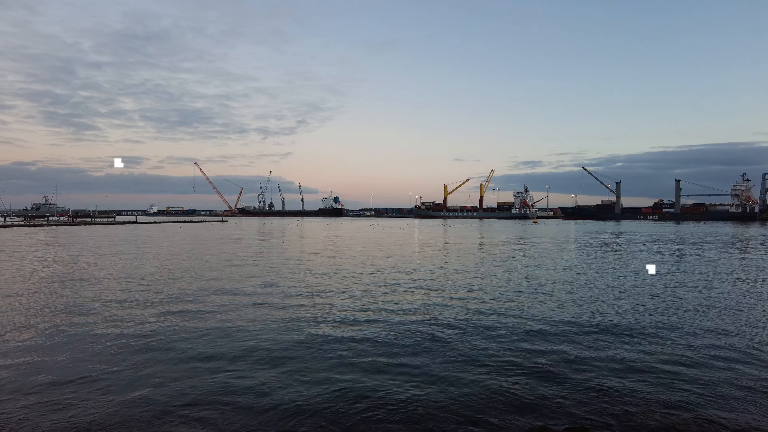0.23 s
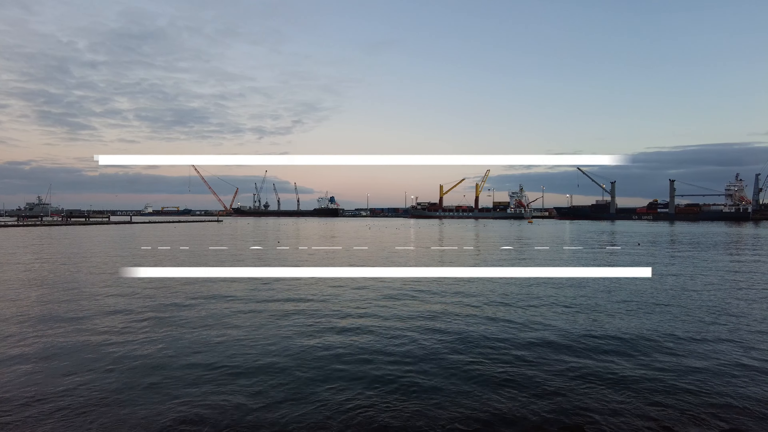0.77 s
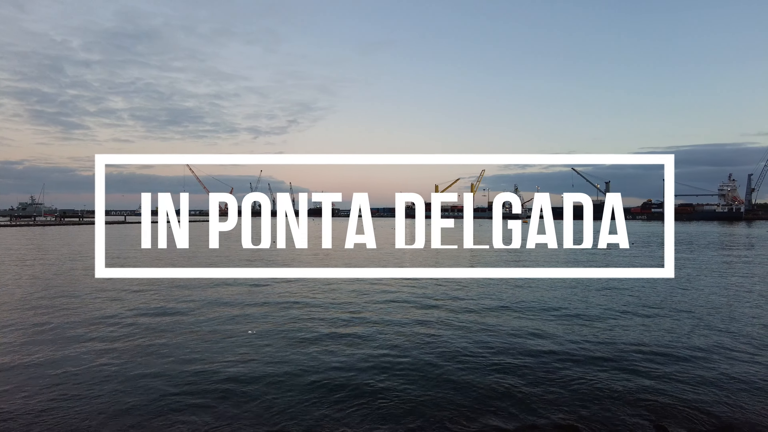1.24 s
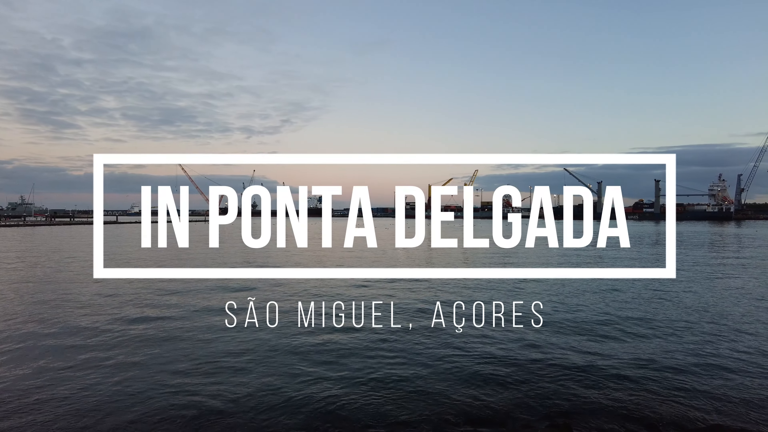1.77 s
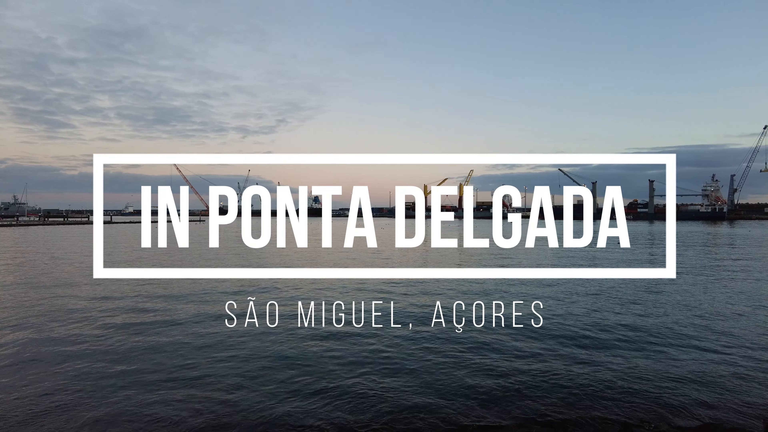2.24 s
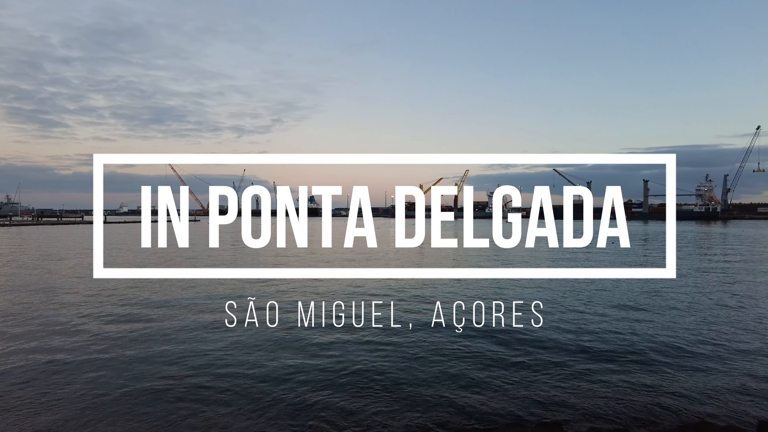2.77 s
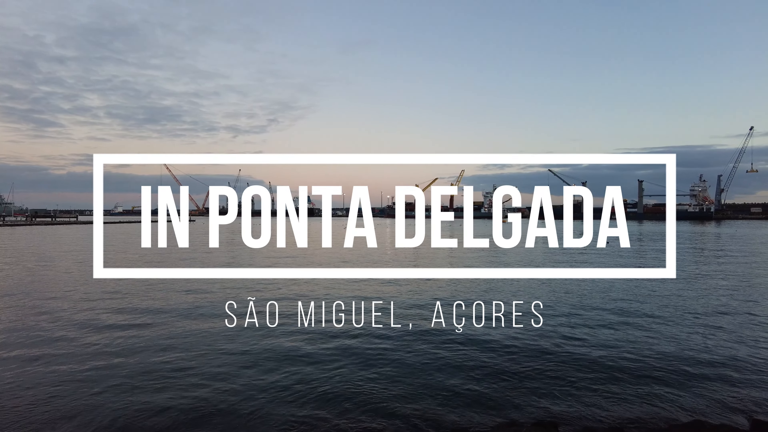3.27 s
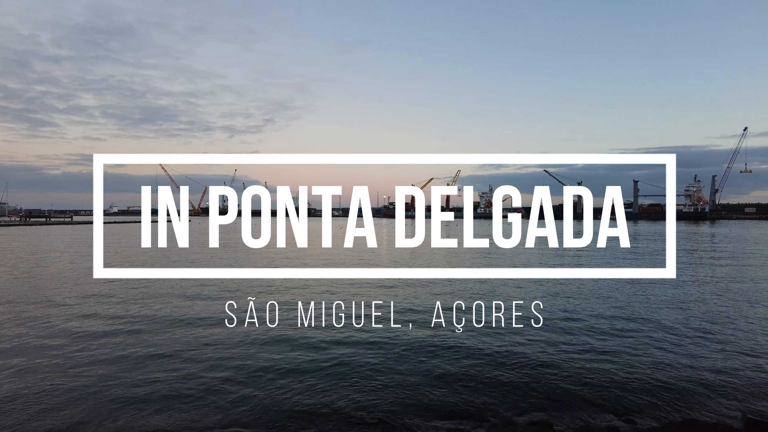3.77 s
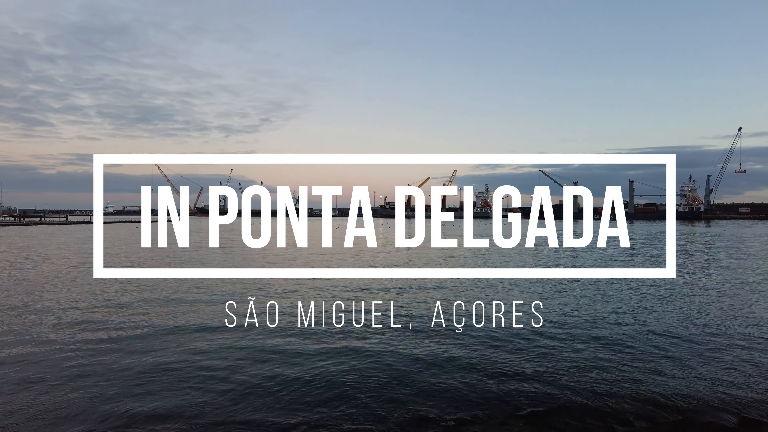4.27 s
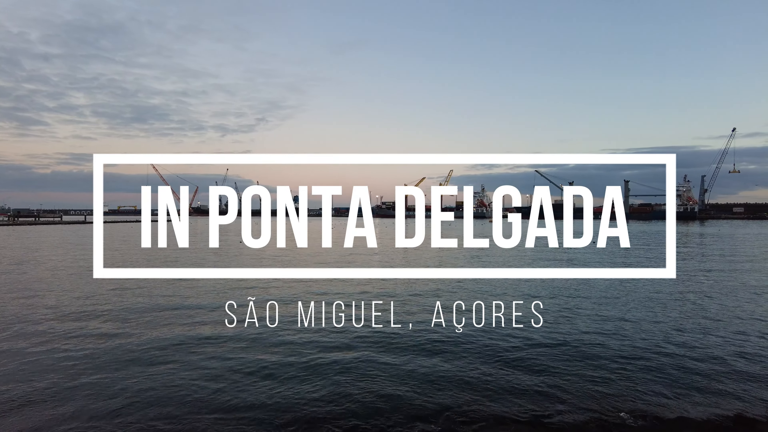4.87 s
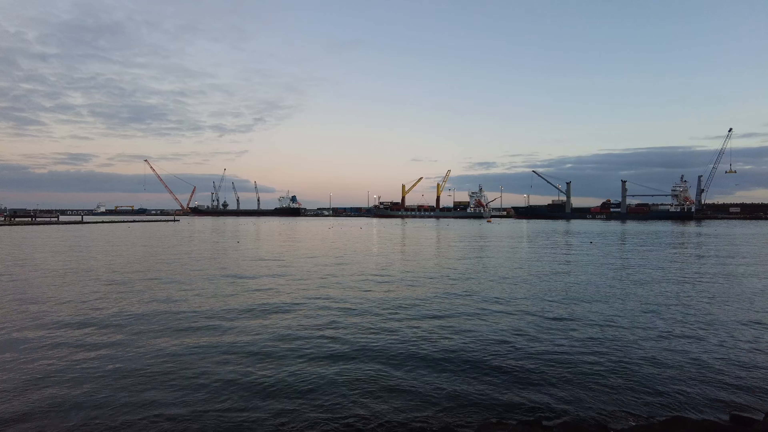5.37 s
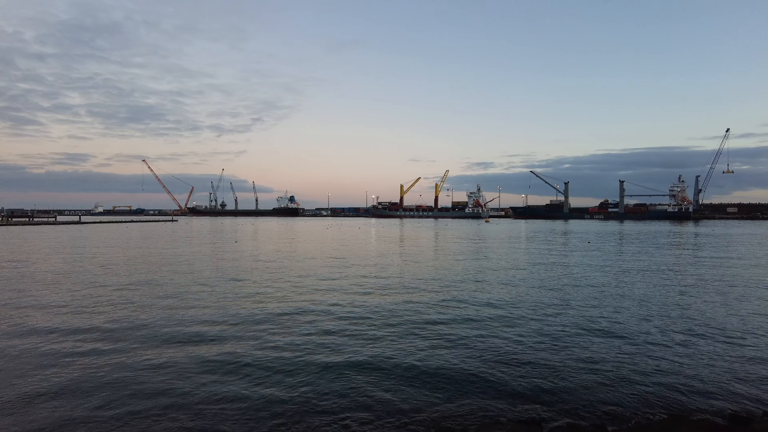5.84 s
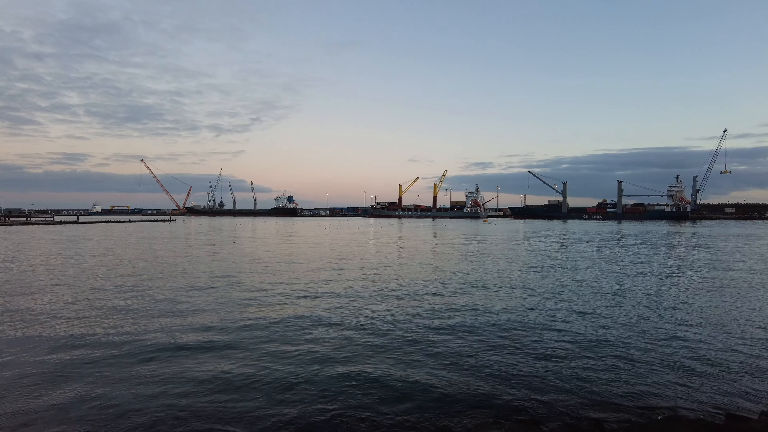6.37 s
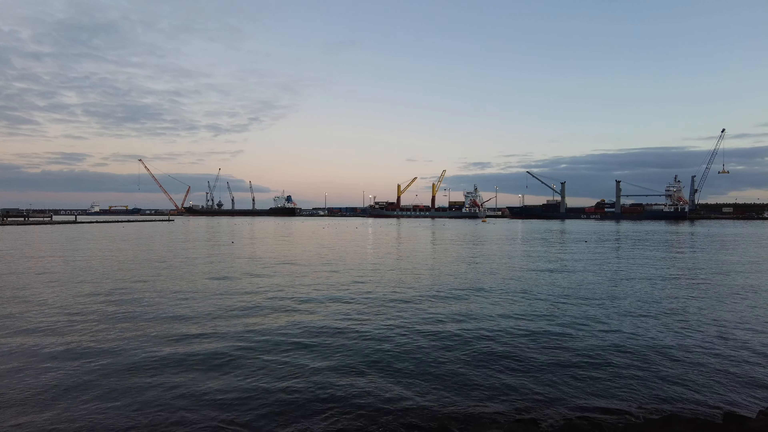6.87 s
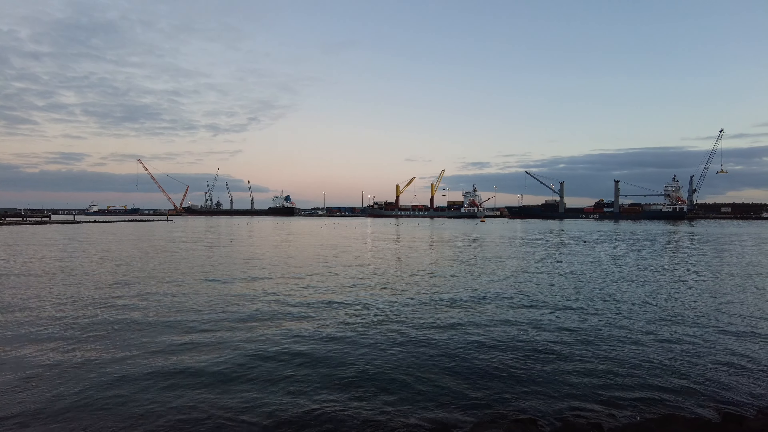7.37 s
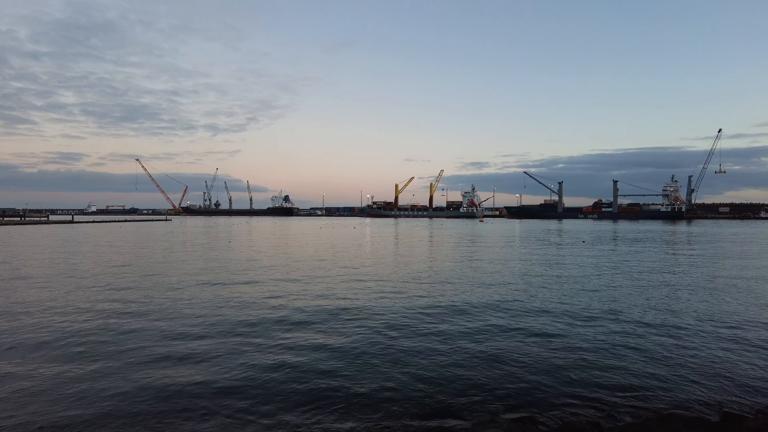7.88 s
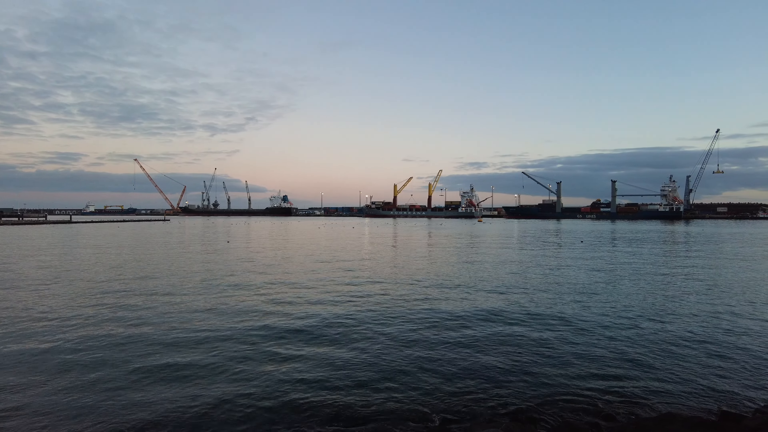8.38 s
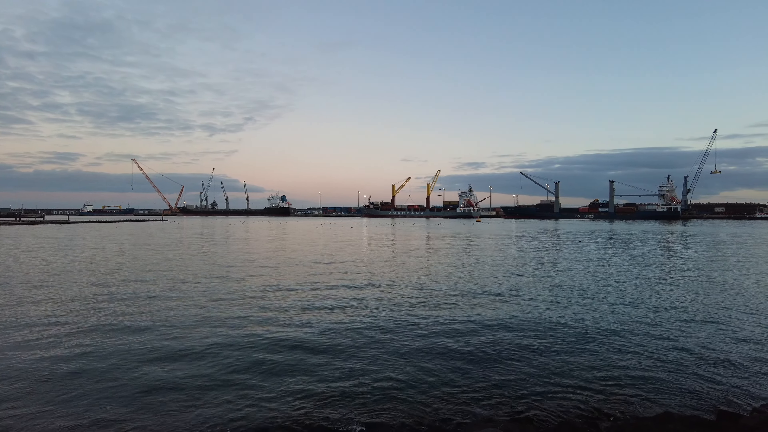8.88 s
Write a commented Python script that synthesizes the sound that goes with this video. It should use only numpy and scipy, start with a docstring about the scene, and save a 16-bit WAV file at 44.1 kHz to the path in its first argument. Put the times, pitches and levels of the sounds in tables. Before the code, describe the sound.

Outdoors on a harbour shore, a distant ship's diesel throbs steadily under a low port rumble, its strength wavering. Soft water washes and fizzes on stones. Small birds twitter, give falling calls and thin whistles, then a gulp of water sounds past the middle. Later three bright, close falling warbles stand out over faint far gulls. One fixed microphone, quiet and open, with slight quay echoes.

```python
"""Harbour at dusk

From the shore, a ship's diesel throbs across calm water: harmonics of one engine cycle, each wavering.
Small birds chirp, whistle and warble nearby as gliding sines, with echoes of decaying noise from the quay.
Water washes and ticks on the stones: shaped noise, ringing bubbles and droplets, and one gulp in a hollow.
Behind it lie faint two-harmonic gull cries, a blur of birds further off, and the port's rumble and hums."""
import sys
import numpy as np
from scipy import signal
from scipy.fft import rfft, irfft, next_fast_len
from scipy.io import wavfile
from scipy.ndimage import uniform_filter1d

SR = 44100
rng = np.random.default_rng(int(sys.argv[2]) if len(sys.argv) > 2 else 0)


def int16_out(signal):
    """Quantize to a 16-bit WAV file."""
    q = np.round(np.clip(np.atleast_2d(signal).T, -1, 1) * 32767)
    wavfile.write(sys.argv[1], SR, q.astype(np.int16))


N = 401751
TIME = np.arange(N) / SR


def undb(db):
    """Decibels to gain."""
    return 10 ** (np.asarray(db) / 20)


def curve(rows, column=1):
    """One column of a time table, interpolated at every sample."""
    rows = np.array(rows)
    return np.interp(TIME, rows[:, 0], rows[:, column])


def walk(rate):
    """Smooth random motion with a spread near 1, from `rate` fresh values a second."""
    k = int(SR / rate)
    held = np.repeat(rng.standard_normal(N // k + 2), k)
    return 1.3 * uniform_filter1d(uniform_filter1d(held, k), k)[:N]


def swell(s, width):
    """A smooth rise to 1 at time s and back."""
    return np.exp(-((TIME - s) / width) ** 2)


def colour(x, points):
    """Give white noise of unit power a spectrum in dB per Hz, eased down towards the top."""
    hz, db = np.transpose(points)
    size = next_fast_len(N)
    f = np.fft.rfftfreq(size, 1 / SR)
    gain = undb(np.interp(np.log(f + 1e-9), np.log(hz), db)) * np.sqrt(SR / 2)
    gain /= 1 + (f / (2 * hz[-1])) ** 2
    return irfft(rfft(x, size) * gain, size)[:N]


def add(out, s, sound):
    """Mix a short sound in at time s."""
    i = max(int(s * SR), 0)
    out[i:i + len(sound)] += sound[:max(N - i, 0)]


def tone(hz):
    """A sine of unit power that follows a pitch."""
    return np.sqrt(2) * np.sin(2 * np.pi * np.cumsum(hz) / SR)


def glide(length, start, middle, end, edge=0.14):
    """Pitch bending through three points, and a loudness that opens and closes softly."""
    u = np.linspace(0, 1, int(length * SR))
    hz = start * (1 - u) * (1 - 2 * u) + 4 * middle * u * (1 - u) + end * u * (2 * u - 1)
    opening = np.sin(np.pi / 2 * np.minimum(np.minimum(u, 1 - u) / edge, 1))
    return hz, opening * (.65 + .35 * np.sin(np.pi * u))


def flutter(n, size=130):
    """Quick, smooth unsteadiness of a voice; a larger size in samples makes it slower."""
    noise = rng.standard_normal(n + size)
    smooth = uniform_filter1d(uniform_filter1d(noise, size), size // 3)
    return smooth[size // 2:][:n] * np.sqrt(size)


def chirp(length, start, middle, end, buzz=0, buzz_hz=190, depth=.055, jitter=.0025, shimmer_db=1.0):
    """A nearly pure whistle; a fast, uneven tremor of the syrinx makes it buzz."""
    hz, loud = glide(length, start, middle, end)
    tremor = np.sin(2 * np.pi * np.cumsum(buzz_hz * (1 + 0.18 * flutter(len(hz)))) / SR)
    bend = 1 + depth * buzz * tremor + jitter * flutter(len(hz))
    shimmer = undb(shimmer_db * flutter(len(hz)))
    return loud * (1 + 0.38 * buzz * tremor) * shimmer * tone(hz * bend)


def sloped(db, change_db, note):
    """A note set to a level, which changes by change_db from its start to its end."""
    return undb(db + change_db * np.linspace(-.5, .5, len(note))) * note


def ring(hz, cycles, rise=0):
    """A struck pocket of air: a sine that falls to 1/e in so many cycles, its pitch perhaps rising."""
    u = np.linspace(0, 1, int(2 * np.pi * cycles * SR / hz) + 2)
    return np.exp(-2 * np.pi * u) * np.sin(2 * np.pi * np.cumsum(hz * (1 + rise * u)) / SR)


def echoes(x, t60, delay):
    """Scattered returns: a delayed, decaying noise tail of unit energy."""
    t = np.arange(int(t60 * SR)) / SR
    tail = rng.standard_normal(len(t)) * undb(-60 * t / t60) * (t > delay)
    return signal.fftconvolve(x, tail / np.linalg.norm(tail))[:N]


# Ship across the water, harmonics of its engine cycle: multiple, level_db, fading_share (0-1)
DIESEL_HARMONICS = [(6, -57, 0), (8, -62, 0.5), (9, -47.5, 0), (10, -46.5, 1), (12, -56, 0.3),
                    (15, -51, 0.9), (16, -58, 0.14), (18, -67, 0.3), (20, -60, 0.7), (21, -63.5, 0.2),
                    (24, -66, 0.05), (25, -67.5, 0.4)]
# How well the diesel carries over the water: time_s, below_100_hz_db, above_100_hz_db
WATER_CARRY = [(0.1, -0.5, 1), (0.7, 3, 3.5), (1.5, 5, 2), (2.6, -0.5, 2.0), (3.6, 3.0, 3), (4.4, 4.5, 1),
               (5.05, 7, -2.5), (5.55, -3, -10), (6.4, 1.5, -0.5), (7.2, 1.5, -1.5), (7.9, -7.5, 4),
               (9.0, -6.5, 2.5)]
CYCLE_HZ = 7.505


def diesel(wander=0.23, waver_db=1.7):
    """Harmonics of one engine cycle beat against each other; the air path makes each waver."""
    out, low_carry, high_carry = 0, curve(WATER_CARRY), curve(WATER_CARRY, column=2)
    for multiple, db, share in DIESEL_HARMONICS:
        hz = round(multiple) * CYCLE_HZ
        carry = low_carry if hz < 100 else high_carry
        phase = 2 * np.pi * (hz * TIME + rng.random()) + wander * walk(3)
        level = undb(db + share * carry + waver_db * walk(4))
        out = out + np.sqrt(2) * np.sin(phase) * level
    return out


def birds(far_echo_db=-6.8, near_echo_db=-12.5, bounce_s=0.0025, wall_s=.011, wall_db=-13.5):
    """Calls, pips, whistles and loud falling warbles, returned by the water and the quay."""
    near = warbler() + twitterer()
    far = pips() + whistles() + callers()
    # a bounce off the water ripples the level of every distant sweep
    far = far + .3 * np.interp(TIME - bounce_s, TIME, far)
    # one off the harbour wall doubles its edge
    far = far + undb(wall_db) * np.interp(TIME - wall_s, TIME, far)
    # the quay returns less of the warbling and the twittering bird, which are nearest
    quay = echoes(undb(far_echo_db) * far + undb(near_echo_db) * near, t60=0.45, delay=0.0034)
    return near + far + quay


# Syllables of three loud falling warbles, close by: top_of_climb_s, length_s, top_hz, level_db
WARBLE_SYLLABLES = [(7.166, .010, 7200, -65), (7.191, 0.018, 5900, -59), (7.215, 0.02, 5620, -52),
                    (7.235, .016, 5070, -54), (7.256, 0.021, 4720, -57), (7.273, 0.027, 4270, -62),
                    (7.291, 0.024, 4020, -59), (7.310, 0.024, 3820, -57.5), (7.325, 0.021, 3540, -56),
                    (7.337, 0.016, 3080, -59), (7.461, 0.01, 6900, -66), (7.488, 0.017, 6170, -56.5),
                    (7.511, 0.026, 5440, -59), (7.533, 0.022, 4960, -49), (7.551, 0.014, 4700, -45.5),
                    (7.571, 0.018, 4490, -50), (7.591, .014, 4310, -52), (7.609, .019, 3950, -58),
                    (7.621, 0.019, 3500, -56.5), (7.635, .015, 3180, -55), (7.647, .013, 2890, -60),
                    (7.782, 0.0082, 7070, -66), (7.806, 0.016, 5930, -53), (7.831, 0.019, 5550, -51),
                    (7.850, .020, 5000, -55), (7.867, 0.018, 4600, -50), (7.887, .020, 4450, -50),
                    (7.908, 0.017, 4250, -49.5), (7.925, 0.012, 4130, -54), (7.941, .007, 3800, -59),
                    (7.95, .013, 3150, -59), (7.964, .013, 2850, -64)]
# Share of its top pitch that a syllable climbs through: top_hz, share (0-1)
CLIMB_BY_PITCH = [(3000, 0.085), (4300, .15), (5500, 0.22), (7000, .13)]


def warbler(climb_share=.8):
    """Runs of saw-tooth syllables step down in pitch; each climbs for climb_share of its length."""
    out, turn = np.zeros(N), min(climb_share, .95)
    for s, length, top, db in WARBLE_SYLLABLES:
        climb = np.interp(top, *np.transpose(CLIMB_BY_PITCH))
        add(out, s - turn * length, undb(db) * tooth(length, top * (1 - climb), top, turn))
    return out


def tooth(length, start, top, turn=.8, rough_db=1.5):
    """One syllable of a warble: it swells as it climbs, then snaps back down; no two are alike."""
    u = np.linspace(0, 1, int(length * SR))
    bow = rng.uniform(.5, .68)  # share of the climb done at half its time
    hz = np.interp(u, [0, turn / 2, turn, 1], [start, start + bow * (top - start), top, start * 0.96])
    loud_points = [0, .3 * turn, .75 * turn, turn, (1 + turn) / 2, 1]
    loud = np.interp(u, loud_points, [0, .45, 1, .7, .3, 0])
    rough = undb(rough_db * flutter(len(u), size=60))
    return loud * rough * tone(hz * (1 + 0.011 * flutter(len(u), size=60)))


# Notes of the near twitter: delay_s, length_s, start_hz, middle_hz, end_hz, level_db, level_change_db
TWITTER_NOTES = [(0, .026, 6420, 5680, 5150, 0, 4), (.031, .012, 4850, 4640, 4450, 2, 5),
                 (.04, .006, 4550, 4100, 3400, 1, -4), (.05, .01, 3300, 3950, 3150, -1.5, 0),
                 (.061, .010, 3200, 3000, 2800, -6, 0)]
# When it is sung: start_s, level_db, buzz (0-1)
TWITTER_TIMES = [(0.011, -64.3, 0.15), (0.125, -63.5, 0.15), (0.238, -65.5, .15), (.358, -67.7, .15),
                 (0.476, -71.5, 0.25), (.594, -67.3, 0.2), (0.712, -68.3, 0.15)]


def twitterer():
    """A near bird repeats one quick run of notes, falling overall."""
    return calls([(TWITTER_NOTES, TWITTER_TIMES)])


# Notes of the more distant calls, each of fixed shape:
# delay_s, length_s, start_hz, middle_hz, end_hz, level_db, level_change_db
TSIP_NOTES = [(0.0014, .053, 5550, 4880, 3500, 0, 0)]
TEW_NOTES = [(0, .063, 4850, 3880, 3050, 0, -1)]
TEE_NOTES = [(0.0036, .058, 4480, 4030, 3450, 0, 0)]
CHUP_NOTES = [(0, .07, 3400, 3120, 2400, 1, 3)]
TSEW_NOTES = [(0, .056, 4550, 3750, 2650, 0, 7)]
TEW_TIK_NOTES = [(0, .079, 5330, 4045, 3190, 0, -2), (.104, 0.022, 3750, 3400, 3100, -1.2, 0)]
# When each is sung: start_s, level_db, buzz (0-1)
TSIP_TIMES = [(1.128, -77, .3), (1.288, -73, 0.3), (1.926, -72, .25), (2.253, -70, .4), (2.542, -72, .35)]
TEW_TIMES = [(2.801, -68.5, .2), (2.992, -68, .2), (3.189, -68.5, .2), (3.383, -71, .2)]
TEE_TIMES = [(3.655, -77, .55), (3.788, -74.5, .5), (3.925, -76, .5), (4.056, -75.5, .5), (5.32, -79, .4)]
CHUP_TIMES = [(2.784, -70.3, .35), (2.944, -69.8, .45), (3.11, -69.3, .55), (6.906, -70, 1),
              (7.073, -68.8, .8)]
TSEW_TIMES = [(5.323, -73, .1), (5.443, -74.5, .1), (5.586, -76, .1), (5.731, -71.5, .1),
              (5.876, -72.5, .1), (6.026, -71, .1)]
TEW_TIK_TIMES = [(6.163, -67.5, .55), (6.344, -71, .4), (6.529, -69.5, .45), (6.718, -67, .9)]


def callers():
    """Birds further away than the warbler and twitterer repeat short falling calls."""
    return calls([(TSIP_NOTES, TSIP_TIMES), (TEW_NOTES, TEW_TIMES), (TEE_NOTES, TEE_TIMES),
                  (CHUP_NOTES, CHUP_TIMES), (TSEW_NOTES, TSEW_TIMES), (TEW_TIK_NOTES, TEW_TIK_TIMES)])


def calls(repertoire, uneven_db=0.7):
    """Birds that repeat one call each, louder or softer, cleaner or buzzier."""
    out = np.zeros(N)
    for notes, sung in repertoire:
        for s, db, buzz in sung:
            for delay, length, start, middle, end, note_db, change_db in notes:
                note = chirp(length, start, middle, end, buzz)
                note_level_db = db + note_db + uneven_db * rng.standard_normal()
                add(out, s + delay, sloped(note_level_db, change_db, note))
    return out


# Short soft pips that drop at one rate: start_s, length_s, pitch_hz, level_db
SOFT_PIPS = [(4.25, .025, 2750, -70), (4.69, .03, 2660, -67), (4.745, .018, 4700, -71),
             (8.595, .02, 2770, -69), (8.935, .018, 2960, -74), (8.997, .018, 3030, -72),
             (9.057, .02, 2940, -70.5)]
PIP_OCTAVES_PER_S = 15
# Sharp flicks that whip downwards: start_s, length_s, pitch_hz, level_db
SHARP_FLICKS = [(5.44, .023, 5900, -66.5), (6.99, 0.0095, 3900, -63), (7.006, .013, 3550, -60.5),
                (8.065, 0.024, 5900, -63.5)]
FLICK_START, FLICK_END = 1.19, .89  # pitch against the middle of the flick
# Rattles of quick down-strokes: start_s, strokes, spacing_s, first_hz, last_hz, level_db,
# swell_exponent (higher peaks more in the middle)
STROKE_RATTLES = [(6.338, 10, .0187, 6150, 5480, -73, .3), (6.328, 7, .0186, 4450, 4300, -77, .3),
                  (6.891, 5, .0184, 5520, 4980, -67.5, 1.3)]
STROKE_S, STROKE_FALL = .014, .16  # length, and fall either side of the middle pitch


def pips(buzz=.1, uneven_db=1.0, stray=.018, stray_s=.0009):
    """Short falling notes: soft pips, sharp flicks and rattles of down-strokes."""
    out = np.zeros(N)
    for s, length, hz, db in SOFT_PIPS:
        fall = 2 ** (PIP_OCTAVES_PER_S * length / 2)
        add(out, s, undb(db) * chirp(length, hz * fall, hz, hz / fall, buzz))
    for s, length, hz, db in SHARP_FLICKS:
        add(out, s, undb(db) * chirp(length, hz * FLICK_START, hz, hz * FLICK_END, buzz))
    for s, strokes, spacing, first, last, db, exponent in STROKE_RATTLES:
        strokes = round(strokes)
        for k, hz in enumerate(np.linspace(first, last, strokes)):
            arch = np.sin(np.pi * (k + .5) / strokes) ** exponent
            hz = hz * (1 + stray * rng.standard_normal())
            stroke = chirp(STROKE_S, hz * (1 + STROKE_FALL), hz, hz * (1 - STROKE_FALL))
            stroke = stroke * np.hanning(len(stroke)) * 2
            when = s + k * spacing + stray_s * rng.standard_normal()
            add(out, when, undb(db + uneven_db * rng.standard_normal()) * arch * stroke)
    return out


# Whistles, glides and brief notes, from 18 ms to almost a second:
# start_s, length_s, start_hz, middle_hz, end_hz, level_db, level_change_db, buzz (0-1)
WHISTLED_NOTES = [(.278, 0.021, 6050, 5950, 5770, -77, 0, 0.1), (.622, 0.02, 6100, 5900, 5800, -74, 2, .2),
                  (.92, .9, 6580, 6620, 6600, -89, 0, .7), (1.054, .06, 6150, 6300, 6450, -78, 0, .4),
                  (1.137, .033, 4470, 4570, 4600, -72, 2, 0.1),
                  (1.209, 0.099, 4320, 4600, 4600, -73, 0, .1), (1.75, .125, 4970, 4920, 4640, -77, -5, .1),
                  (2.0, 0.19, 3190, 3090, 3000, -78, 0, .4), (2.787, .03, 5600, 5300, 4950, -77, 0, .4),
                  (3.272, 0.025, 4880, 4640, 4350, -67, 1, .15),
                  (3.518, .08, 6150, 5460, 5100, -75.5, -7, 0), (3.705, .045, 4520, 4580, 4620, -79, 2, .1),
                  (3.835, .095, 3100, 3220, 3350, -76, -1, .3), (3.878, .02, 2560, 2510, 2480, -67, 0, .1),
                  (3.97, .085, 3420, 3440, 3490, -75.5, -10, .1),
                  (3.992, 0.195, 6900, 6410, 6260, -76, 3, 0), (4.022, .03, 5600, 5430, 5250, -78, 3, .2),
                  (4.07, .17, 5080, 4700, 4480, -81.5, -5, .1),
                  (4.175, .21, 3880, 3660, 3590, -76.5, -1, 0.3),
                  (4.215, .245, 4480, 4830, 5040, -80.5, 0, .1), (4.345, .11, 5300, 5100, 4950, -80, 0, .2),
                  (4.385, .06, 6850, 6600, 6400, -74, 7, .12), (4.45, .245, 6250, 5350, 4660, -72, 14, .12),
                  (4.437, .032, 6450, 6300, 5970, -71, -1, 1), (4.524, .18, 4500, 4120, 3820, -80, 0, .1),
                  (4.868, .2, 5780, 4960, 4420, -75, 3, 0), (4.886, 0.172, 3670, 4010, 4300, -61.5, 7, 0),
                  (5.047, 0.1, 4350, 4510, 4700, -66, 0, 0), (5.031, 0.13, 4580, 4730, 4820, -71.5, 0, 0),
                  (5.255, .042, 4980, 4720, 4350, -71.5, 1, .2),
                  (5.38, .16, 4920, 4100, 3500, -72.5, -5, .25), (5.57, .025, 5350, 5050, 4850, -77, 2, .5),
                  (5.604, .06, 3670, 3480, 3520, -67, 3, .1),
                  (5.706, .125, 5280, 4430, 3890, -67.5, 1, .25),
                  (5.79, .032, 4180, 3950, 3750, -67, 0, 0.4), (5.86, .025, 5200, 5000, 4800, -75, 0, .6),
                  (5.875, .025, 3520, 3470, 3480, -73, 0, .2), (5.976, .06, 4170, 3850, 3250, -68, -2, .45),
                  (5.988, 0.018, 4300, 4120, 3900, -70, 0, .6), (6.011, .018, 5150, 5000, 4800, -73, 0, .4),
                  (6.197, .018, 4210, 4000, 3800, -65, 0, .7),
                  (6.708, 0.066, 5600, 4700, 3850, -64.5, -3, 1),
                  (7.222, .085, 5250, 4550, 3950, -66.5, -2, 1),
                  (7.389, 0.025, 5820, 5840, 5700, -65, 4, .1),
                  (7.822, .072, 3560, 3440, 3350, -62, 1, 0.4), (7.93, .14, 6250, 6180, 6120, -80, 0, 0),
                  (8.123, 0.044, 4750, 4990, 5030, -56, 7, 0),
                  (8.319, .27, 6300, 5310, 4690, -79.5, 10, 0.2),
                  (8.798, 0.3, 3490, 4050, 4480, -72, -4, 0.2)]
# Upslurs that climb quickly to a knee and then creep higher: start_s, length_s, level_db
KNEED_UPSLURS = [(7.602, .172, -70.5), (7.878, 0.267, -68), (8.253, .23, -72), (8.548, 0.22, -71.5)]
UPSLUR_START_HZ, UPSLUR_KNEE_HZ = 3050, 4520
UPSLUR_CLIMB_S, UPSLUR_CREEP_HZ_PER_S = .05, 1700


def whistles(slur_jitter=0.009, slur_shimmer_db=2.0, fading_db=1.0):
    """Long and brief glides that may swell or fade, and upslurs; all flicker on their way through the air."""
    out = np.zeros(N)
    for s, length, start, middle, end, db, change_db, buzz in WHISTLED_NOTES:
        note = chirp(length, start, middle, end, buzz)
        add(out, s, sloped(db, change_db, note))
    for s, length, db in KNEED_UPSLURS:
        t = np.arange(int(length * SR)) / SR
        below_knee = (UPSLUR_KNEE_HZ - UPSLUR_START_HZ) * np.exp(-t / UPSLUR_CLIMB_S)
        hz = UPSLUR_KNEE_HZ - below_knee + UPSLUR_CREEP_HZ_PER_S * t
        loud = np.sin(np.pi * t / length) ** 0.23 * undb(db + slur_shimmer_db * flutter(len(t)))
        add(out, s, loud * tone(hz * (1 + slur_jitter * flutter(len(t)))))
    return out * undb(fading_db * walk(45))


# Spectrum of the wash on the shore, before swells and lulls: pitch_hz, level_db_per_hz
WASH_SPECTRUM = [(250, -105), (550, -88.5), (760, -87.5), (980, -90.5), (1150, -95), (1550, -96),
                 (2050, -101), (2650, -102.5), (3300, -110), (5000, -116), (6600, -118), (8700, -132),
                 (12500, -132), (13500, -142)]
# Spectrum of the fizz, before swells and lulls: pitch_hz, level_db_per_hz
FIZZ_SPECTRUM = [(1500, -128), (3800, -114), (5500, -116), (7500, -124), (9000, -135), (15000, -143)]
# Swells and lulls of the water: centre_s, change_from_calm_db
WATER_SWELLS = [(0.1, -1.5), (1.6, -1), (4.7, 3), (5.5, 3.5), (6.35, 3), (8.6, 1.5)]
SWELL_S, CALM_DB = 0.45, -0.5  # width of each; level of calm water


def water(count=520, bubble_db=-77, spread_db=5.0, grain_db=3.0):
    """A broad wash, with fizz and tiny ringing bubbles that follow the swells and lulls more strongly."""
    swell_db = CALM_DB + sum(db * swell(s, SWELL_S) for s, db in WATER_SWELLS)
    swelling = undb(swell_db)
    wash = colour(rng.standard_normal(N), WASH_SPECTRUM) * undb(0.11 * swell_db + 0.65 * walk(14))
    # sparse grains of uneven strength
    grains = rng.standard_normal(N) * (rng.random(N) < .06)
    spray = grains * undb(grain_db * np.minimum(rng.exponential(size=N), 4))
    fizz = colour(spray / spray.std(), FIZZ_SPECTRUM) * undb(1.2 * walk(24))
    out = wash + swelling * fizz
    for when, pitch, size, cycles in rng.random((count, 4)):
        i = int(when * N)
        db = bubble_db - spread_db * np.log(size + .02)
        bubble = ring(1200 * 5.5 ** pitch, 3 + 9 * cycles, rise=0.2)
        add(out, i / SR, swelling[i] * undb(db) * bubble)
    return out


# Droplets on the stones: start_s, level_db, centre_hz
STONE_DROPS = [(1.108, -57, 6500), (1.405, -59, 7800), (4.652, -54, 5500), (4.747, -58, 5500),
               (5.172, -55, 5500), (5.292, -50, 3740), (5.47, -59, 6000), (6.223, -47, 2300),
               (7.98, -52, 5800), (8.733, -57, 6500), (8.788, -58, 6500), (8.879, -55, 8600),
               (8.922, -52, 5730)]
# The hollow where the water gulps: pitch_hz, level_db, cycles_to_fall_to_1/e
GULP_HOLLOW = [(151, -37.5, 3.5), (210, -34, 1.6), (288, -48, 2.7)]
GULP_S = 6.222


def splashes(spatter_db=-9, spatter_s=0.0024, dull_hz=9500):
    """Droplets tick and spatter as short rings and noise; once the water gulps in a resonant hollow."""
    out = np.zeros(N)
    t = np.arange(SR // 100) / SR
    for s, db, hz in STONE_DROPS:
        spatter = rng.standard_normal(len(t)) * np.exp(-t / spatter_s)
        tick = ring(hz, 0.88)
        add(out, s, undb(db + spatter_db) * np.convolve(spatter, tick / np.linalg.norm(tick)))
        add(out, s, undb(db - 13.5) * ring(hz * .9, 9, rise=.2))
    for hz, db, cycles in GULP_HOLLOW:
        add(out, GULP_S, undb(db) * ring(hz, cycles))
    return signal.sosfilt(signal.butter(2, dull_hz, fs=SR, output="sos"), out)


# Gulls far off: start_s, length_s, pitch_hz, fall_octaves, level_db
GULL_CRIES = [(6.702, 0.085, 778, 0.024, -58.5), (6.802, 0.11, 773, 0.038, -64),
              (7.26, 0.09, 1022, -.06, -61.5), (7.362, .1, 985, 0.1, -63.5), (7.51, 0.08, 840, 0.18, -61.5),
              (7.789, 0.06, 790, 0.33, -56.5), (7.79, 0.07, 1777, -0.023, -66),
              (7.888, .052, 1520, 0.33, -59.5), (8.19, 0.085, 1035, 0.05, -59.5),
              (8.345, .05, 1320, .06, -66.5), (8.45, 0.08, 1008, -0.03, -63),
              (9.02, 0.085, 830, -0.12, -61)]
# The gull's throat favours the lower overtones: overtone_hz, second_harmonic_db
THROAT_RESPONSE = [(1540, -7.5), (1660, -16), (2050, -22)]


def gulls(echo_db=-7, arch=0.045):
    """Far arching cries, dulled to two harmonics and smeared over the water."""
    out = np.zeros(N)
    for s, length, pitch, fall, db in GULL_CRIES:
        ends, half_fall = pitch * (1 - arch), 2 ** (fall / 2)
        hz, loud = glide(length, ends * half_fall, pitch, ends / half_fall)
        hz = hz * (1 + 0.018 * flutter(len(hz), size=300))
        second_db = np.interp(2 * pitch, *np.transpose(THROAT_RESPONSE))
        add(out, s, undb(db) * loud * (tone(hz) + undb(second_db) * tone(2 * hz)))
    return out + undb(echo_db) * echoes(out, t60=0.41, delay=0.015)


def flock(count=230, db=-88.0):
    """A blur of short falling calls from birds further off, busier as time goes on."""
    out = np.zeros(N)
    for when, pitch, length, slope, size in rng.random((count, 5)):
        hz, fall = 3200 + 3000 * pitch, .02 + .1 * slope
        call = chirp(.012 + .04 * length ** 2, hz * (1 + fall), hz, hz * (1 - fall), buzz=.4)
        add(out, when ** .75 * N / SR, undb(db + 5 * size) * call)  # the power crowds calls later
    return out + echoes(out, t60=0.13, delay=0.0042)


# Spectrum of the port's rumble, far off: pitch_hz, level_db_per_hz
PORT_SPECTRUM = [(8, -81), (27, -61), (46, -60.5), (57, -67.5), (100, -71), (200, -74), (300, -80.5),
                 (400, -83.5), (500, -91), (1000, -102), (3000, -125)]
# Faint unsteady hums, each swelling once, some briefly:
# centre_hz, wavering_hz, loudest_s, swell_width_s, loudest_db
FAINT_HUMS = [(283.5, 12, 5.5, 2.6, -61), (408, 7, 4.4, 2.5, -63.7), (590, 16, 3.35, .35, -66.5),
              (670, 7, 5.0, .22, -67), (771, 8, 0.2, 0.82, -69.5)]
HUM_SWELL_DB = 9.5


def port():
    """Rumble of far machinery as shaped noise, with faint hums of wavering pitch."""
    out = colour(rng.standard_normal(N), PORT_SPECTRUM) * undb(.5 * walk(1.8))
    for hz, waver_hz, s, width, db in FAINT_HUMS:
        level_db = db + HUM_SWELL_DB * (swell(s, width) - 1) + 2 * walk(10)
        out = out + tone(hz + waver_hz * walk(30)) * undb(level_db)
    return out


def scene():
    """Everything as heard from the shore, on one microphone."""
    return (diesel() + birds() + water() + splashes() + gulls() + flock() + port())[None]


START_S, TOP_HZ = .036, 15700


def record(dry):
    """Silence for 36 ms, then the sound fades in over 4 ms; a steep low-pass cuts the top."""
    opened = np.clip((TIME - START_S) / .004, 0, 1)
    return signal.sosfilt(signal.ellip(8, .2, 70, TOP_HZ, fs=SR, output="sos"), dry * opened)


dry = scene()
out = record(dry)
int16_out(out)
```